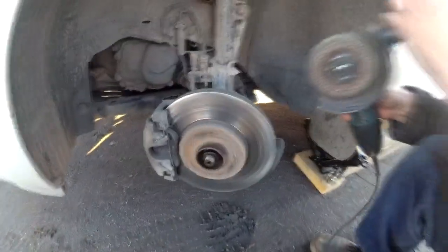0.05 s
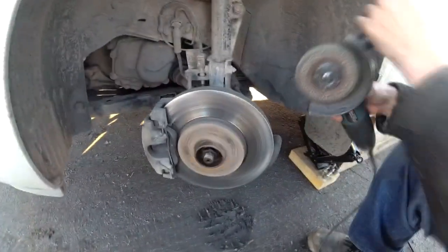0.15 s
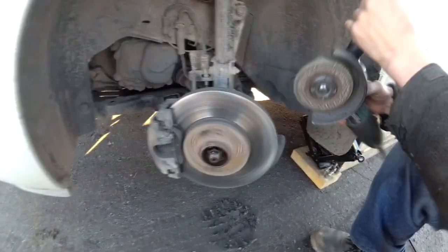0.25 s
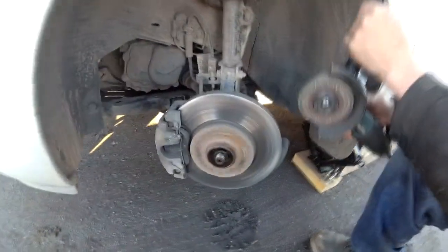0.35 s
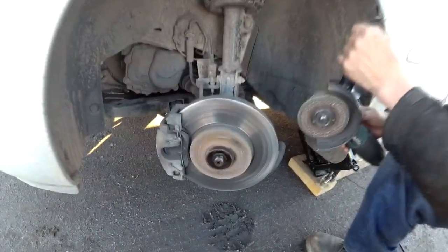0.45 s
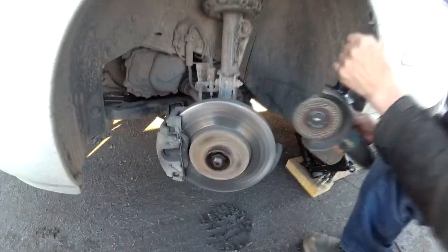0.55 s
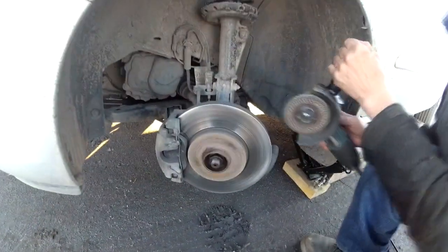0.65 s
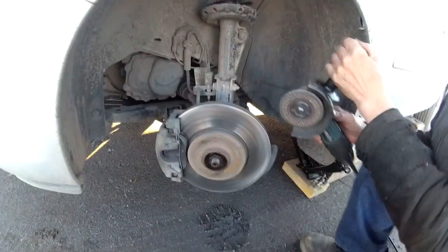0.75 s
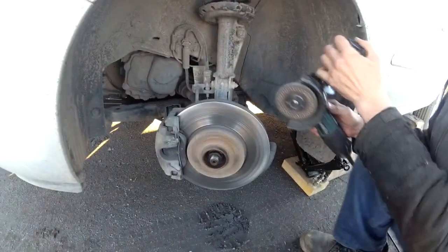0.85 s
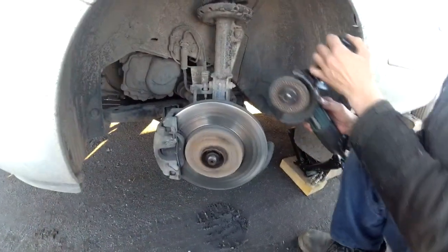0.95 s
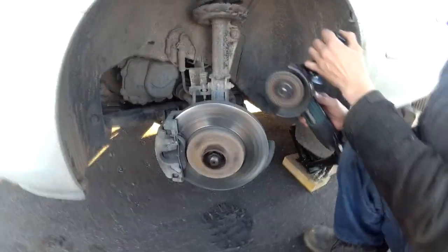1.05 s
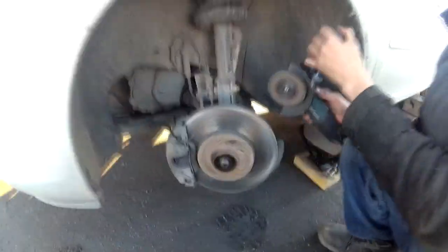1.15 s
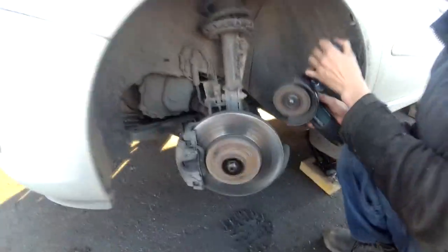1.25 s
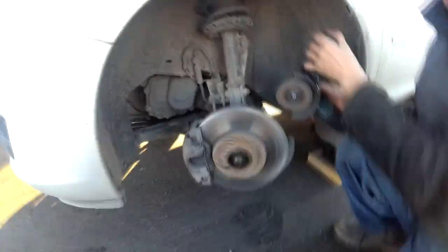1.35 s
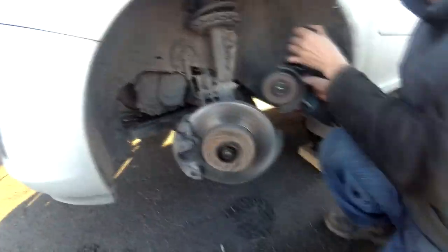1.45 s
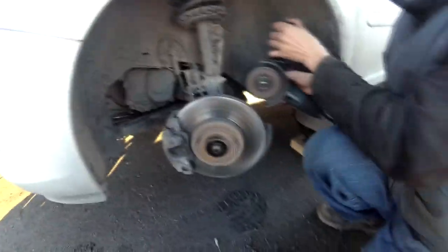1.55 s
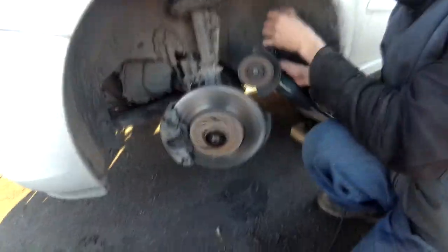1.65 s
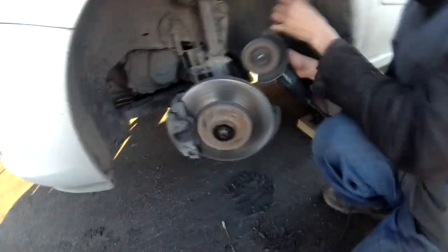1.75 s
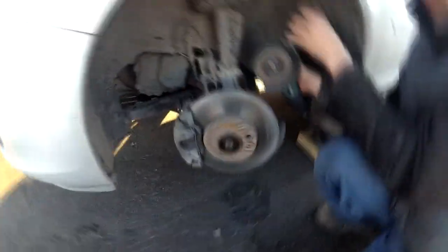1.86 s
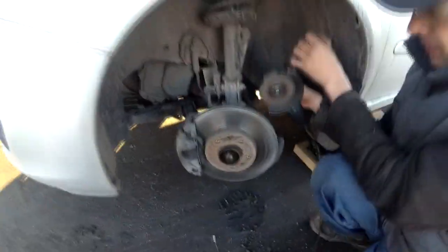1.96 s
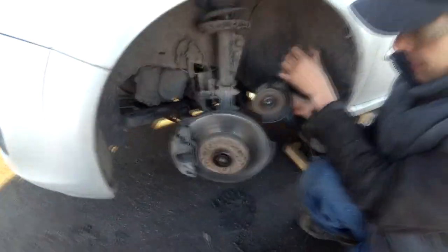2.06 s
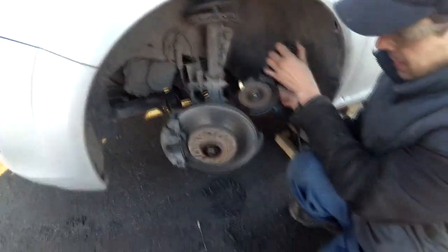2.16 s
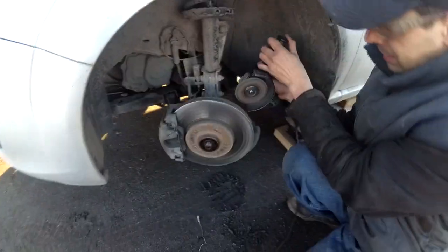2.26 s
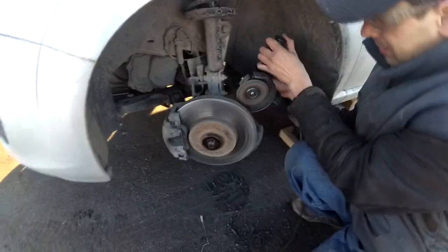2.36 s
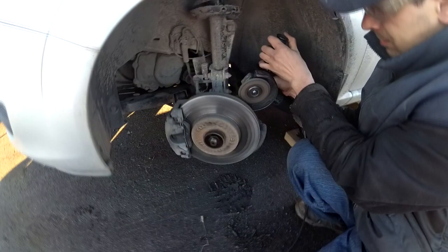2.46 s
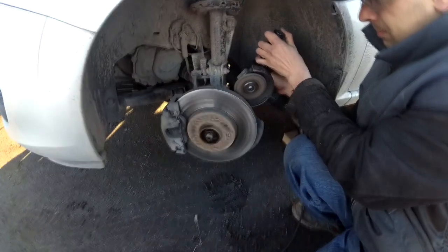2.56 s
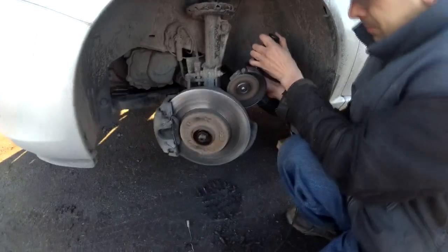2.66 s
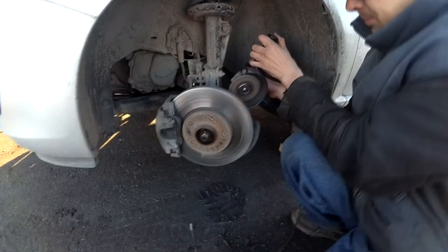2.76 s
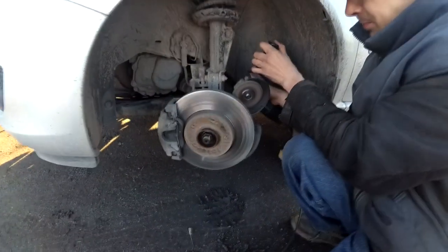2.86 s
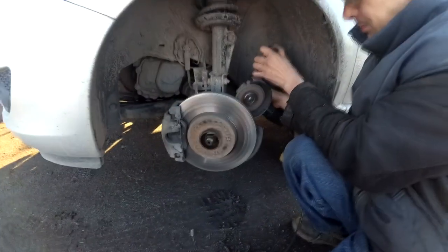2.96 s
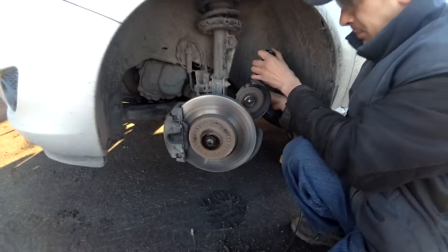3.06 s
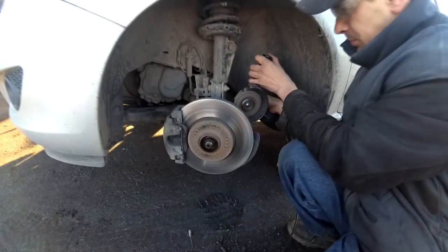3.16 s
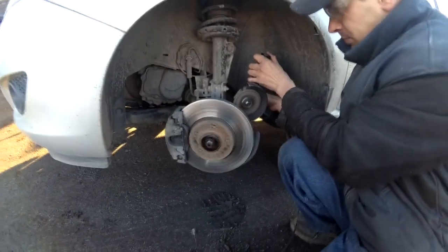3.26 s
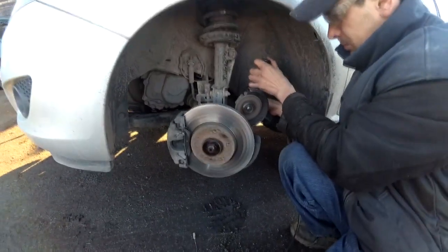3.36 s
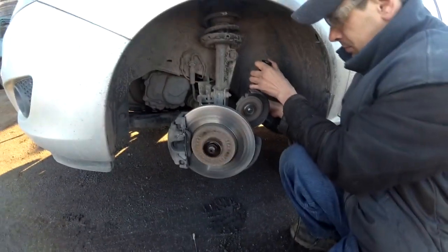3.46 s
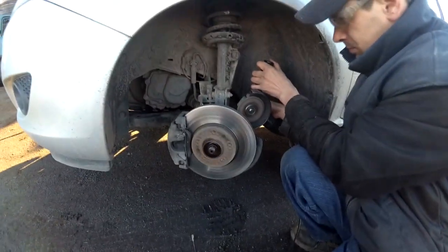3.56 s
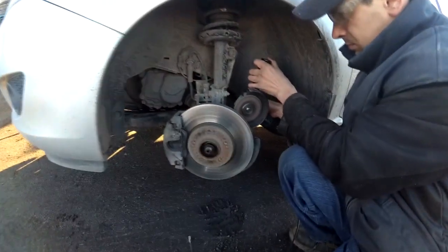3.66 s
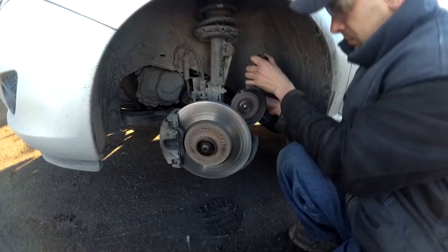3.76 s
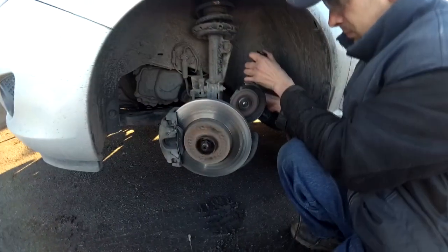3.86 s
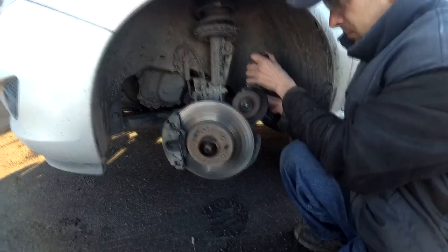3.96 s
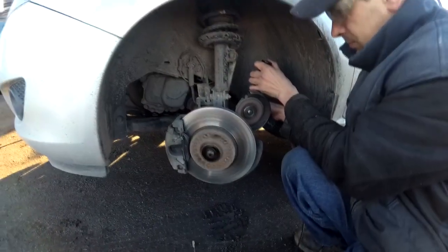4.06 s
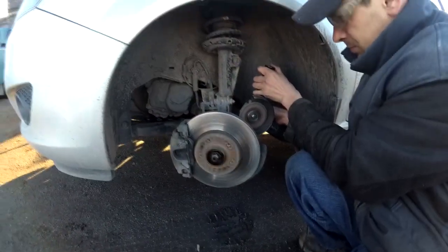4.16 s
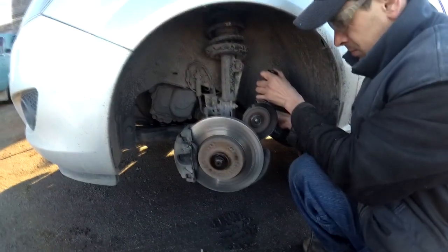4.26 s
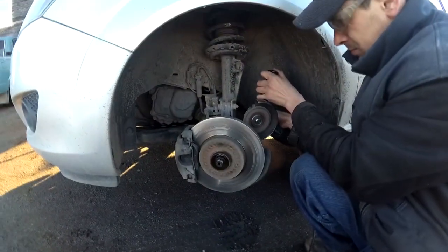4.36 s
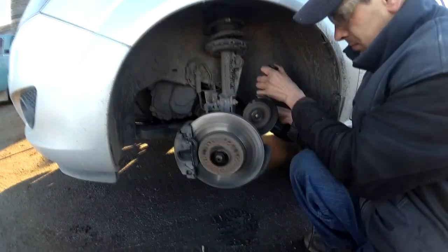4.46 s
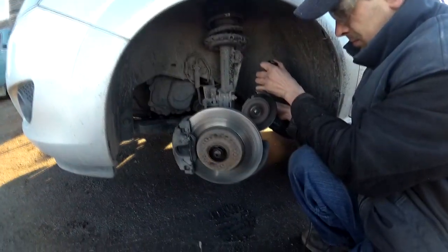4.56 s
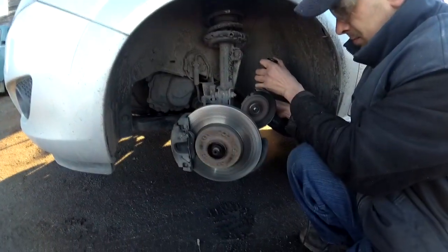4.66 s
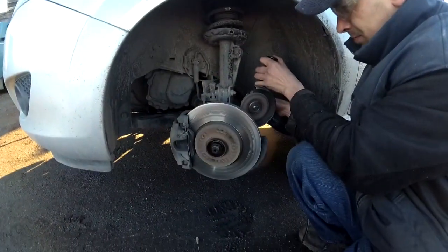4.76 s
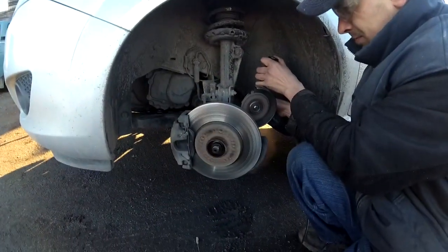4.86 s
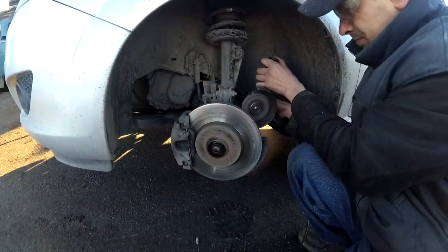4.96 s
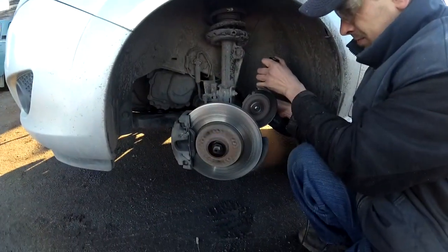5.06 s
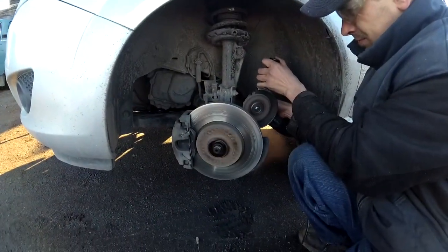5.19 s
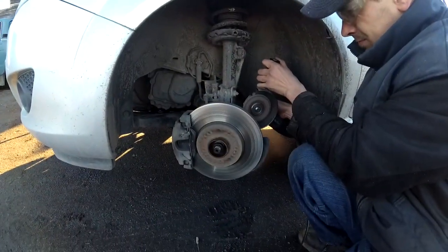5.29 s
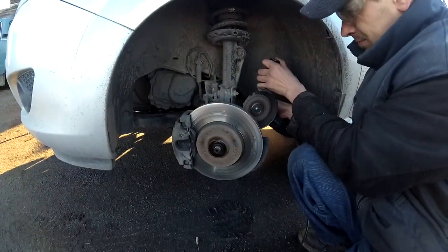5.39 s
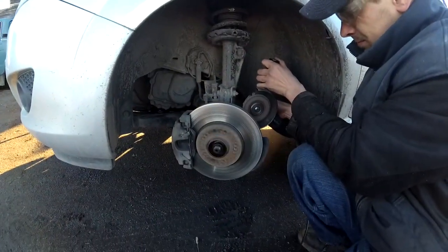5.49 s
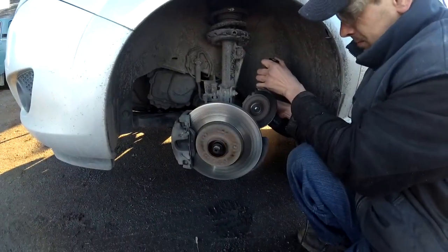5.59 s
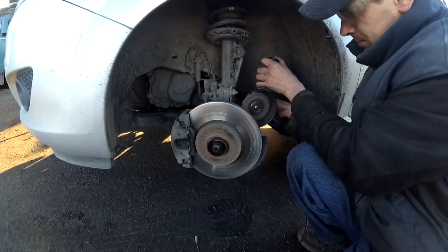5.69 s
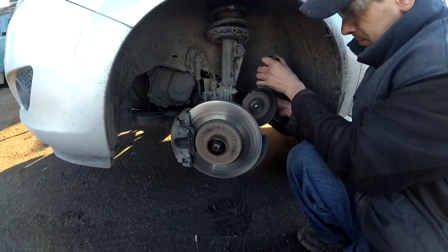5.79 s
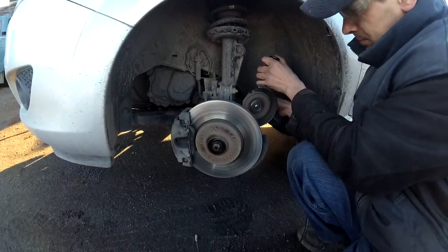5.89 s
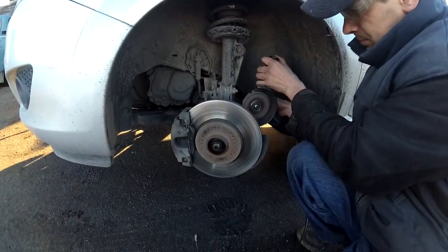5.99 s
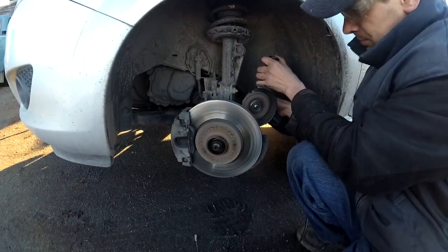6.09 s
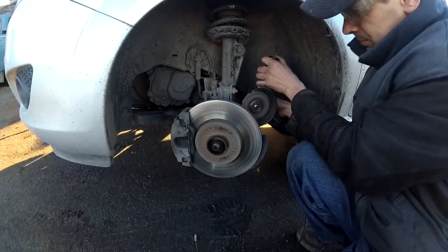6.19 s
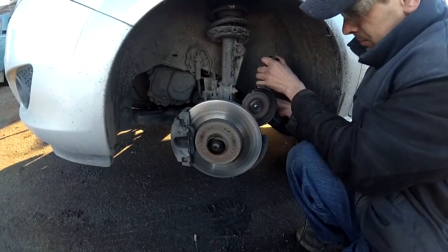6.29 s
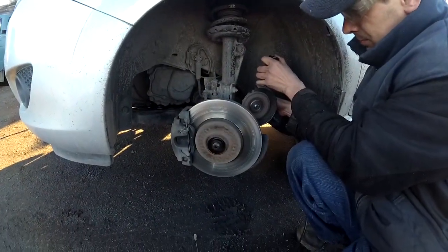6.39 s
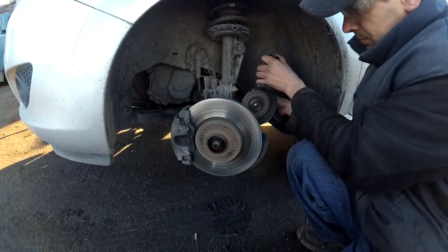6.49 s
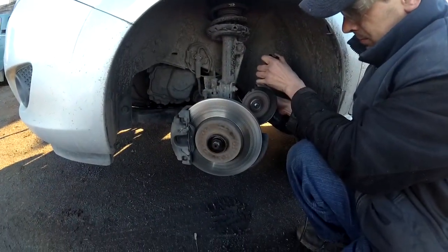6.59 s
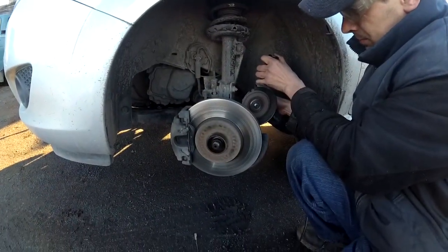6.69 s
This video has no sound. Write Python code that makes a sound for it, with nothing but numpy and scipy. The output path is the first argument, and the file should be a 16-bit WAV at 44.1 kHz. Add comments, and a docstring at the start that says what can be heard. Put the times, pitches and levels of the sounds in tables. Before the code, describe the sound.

Outdoors, close to a car's wheel arch, a steady engine idle throbs with low exhaust rumble and light valve hiss. At about 0.93 s it abruptly becomes much quieter. At 1.1 s a switch clacks and an angle grinder jumps to speed, its rough gear rattle and ringing housing climbing into a full whine with motor roar and airy fan hiss by about 2.3 s. Small dull knocks fall near 2.2 and 2.6 s. A brief glancing scrape comes at 3.1 s; the free whine continues, with a momentary dip near 3.7 s. From 4.1 s the flap disc meets the turning brake disc: harsh bright grit, rapid buzzing repetition and shrill steel resonances, broken by irregular hops and landings. The pitch sags slowly under load, motor and idle sink behind, and scraping becomes denser and more stuttering, still going at the end, about 6.7 s.

```python
"""In a wheel arch beside a jacked-up car with its engine idling, an angle grinder is switched on.
It runs up and whines free: motor noise, fan hiss and gear tones ring through housing and guard.
Then its flap disc meets the rim of the turning brake disc, hopping: grit noise and a pattern repeating
each turn drive the steel's resonances, while motor and fan are heard more faintly. The steady idle is pulsed
noise, heard quieter from .93 s and quieter still under the grinding; dull knocks and street rumble lie behind."""
import sys
import numpy as np
from scipy import signal
from scipy.fft import rfft, irfft, next_fast_len
from scipy.io import wavfile
from scipy.ndimage import uniform_filter1d

SR = 44100
rng = np.random.default_rng(int(sys.argv[2]) if len(sys.argv) > 2 else 0)


def generate_wav(sig):
    """Save sig (samples, or channels by samples) to the path in sys.argv[1] as 16-bit PCM at SR."""
    pcm = np.round(np.clip(np.atleast_2d(sig).T, -1, 1) * 32767).astype(np.int16)
    wavfile.write(sys.argv[1], SR, pcm)


N = 296918
START_S, TOUCH_S = 1.105, 4.105   # switch on; flap disc laid on the rim


def amp(db):
    """Decibels to gain."""
    return 10 ** (np.asarray(db) / 20)


def unit(x):
    """Scale to rms 1."""
    return x / np.sqrt(np.mean(x ** 2) + 1e-20)


def clock():
    """Time of every sample in seconds."""
    return np.arange(N) / SR


def in_time(rows):
    """Join a table of times and levels by straight lines, at every sample."""
    s, level_db = np.transpose(rows)
    return np.interp(clock(), s, level_db)


def colour(x, points):
    """Filter by a (frequency [Hz], level [dB]) curve on a log frequency axis."""
    size = next_fast_len(N + 4096)
    hz, db = np.transpose(points)
    log_hz = np.log(np.maximum(np.arange(size // 2 + 1) * SR / size, 1))
    gain = amp(np.interp(log_hz, np.log(hz), db))
    return irfft(rfft(x, size) * gain, size)[..., :N]


def noise(spectrum):
    """Two unrelated draws of coloured noise: one for what left and right share, one for what differs."""
    return unit(colour(rng.standard_normal((2, N)), spectrum))


def resonate(x, hz, width):
    """Two-pole resonance with gain 1 on top; a narrower width [Hz] rings longer."""
    r = np.exp(-np.pi * width / SR)
    zeros = np.array([1, 0, -1]) * (1 - r * r) / 2
    poles = [1, -2 * r * np.cos(2 * np.pi * hz / SR), r * r]
    return signal.lfilter(zeros, poles, x + 1e-18)


def drift(rate):
    """Slow chance with spread 1: noise through two equal low-passes at rate [Hz]."""
    r = np.exp(-2 * np.pi * rate / SR)
    return unit(signal.lfilter([1], [1, -2 * r, r * r], rng.standard_normal(N + SR))[SR:])


def swell(at, heights, rise_s, fall_s):
    """Envelope that rises fast and dies away after each given time; lone tops reach the given heights."""
    marks, t = np.zeros(N), np.arange(int(.08 * SR)) / SR
    np.add.at(marks, np.minimum((np.asarray(at) * SR).astype(int), N - 1), heights)
    shape = (1 - np.exp(-t / rise_s)) * np.exp(-t / fall_s)
    return signal.fftconvolve(marks, shape / shape.max())[:N]


# free speed, still creeping up until the touch
FREE_TURNS_PER_S, CREEP_TURNS_PER_S2 = 151.4, 3.24
# speed missing at the start: quick and slow part
JUMP_TURNS_PER_S, JUMP_S, CLIMB_TURNS_PER_S, CLIMB_S = 89.1, .1007, 37.2, .56
# speed lost under load: quick and slow part
BITE_TURNS_PER_S, BITE_S, DRAG_TURNS_PER_S, DRAG_S = 5.2, .08, 49, 4.4


def spindle():
    """Turns per second: a jump and a slow climb after the switch, a quick and a slow loss under load."""
    on = np.maximum(clock() - START_S, 0)
    load = np.maximum(clock() - TOUCH_S, 0)
    free = FREE_TURNS_PER_S + CREEP_TURNS_PER_S2 * (on - load)
    missing = JUMP_TURNS_PER_S * np.exp(-on / JUMP_S) + CLIMB_TURNS_PER_S * np.exp(-(on / CLIMB_S) ** 2)
    bite = BITE_TURNS_PER_S * (1 - np.exp(-load / BITE_S))
    drag = DRAG_TURNS_PER_S * (1 - np.exp(-load / DRAG_S))
    return free - missing - bite - drag


# the big hops of the flap disc: (landing [s], scrape sunk by then [dB])
HOPS = [(4.14, -18), (4.225, -8), (4.296, -22), (4.3223, -12), (4.3553, -15), (4.3816, -11), (4.4136, -6),
        (4.5696, -3), (4.59, -10), (4.6102, -28), (4.63, -22), (4.649, -25), (4.6742, -30), (4.698, -35),
        (4.7235, -29), (5.0322, -9), (5.114, -3), (5.1686, -13), (5.2023, -13), (5.321, -11), (5.3764, -9),
        (5.405, -11), (5.4821, -12), (5.5375, -19), (5.5582, -14), (5.5792, -23), (5.6013, -29),
        (5.6196, -25), (5.641, -22), (5.659, -22), (5.7137, -15), (5.736, -21), (5.756, -21), (5.778, -24),
        (5.795, -21), (5.8576, -15), (5.8937, -15), (5.9148, -13), (5.9566, -14), (5.9715, -15),
        (5.9925, -10), (6.014, -14), (6.0594, -15), (6.0795, -16), (6.1087, -9), (6.1304, -19),
        (6.165, -18), (6.1957, -16.5), (6.239, -10), (6.2593, -23), (6.2805, -27), (6.3037, -17),
        (6.318, -13), (6.3337, -17), (6.406, -11), (6.4202, -8), (6.4374, -18), (6.4517, -14),
        (6.4668, -15), (6.4948, -12), (6.511, -14), (6.601, -16), (6.6173, -13), (6.637, -15),
        (6.6573, -14), (6.6764, -21)]
SINK_DB_PER_S, SINK_CURVE = 1400, 0.64   # sets the air time; below 1 the sinking is steepest at first
SETTLE_S = 0.0037   # smoothing, as the disc comes down on the rim again
# share of the other turns that end a small skip, its growth, depth, calm kept round big hops
SKIP_SHARE, SKIP_GROWTH_PER_S, SKIP_DB, SKIP_CLEAR_S = .2, .15, -7.5, 0.011


def hops(turns):
    """Landing times, and the dB lost in the air: big hops as listed, small skips on chance turns."""
    s, lift_db = np.transpose(HOPS)
    laps = np.flatnonzero(np.diff(np.floor(turns))) / SR
    luck = rng.random((len(laps), 2))
    clear = np.abs(laps[:, None] - s).min(axis=1) > SKIP_CLEAR_S
    chance = SKIP_SHARE + SKIP_GROWTH_PER_S * (laps - TOUCH_S)
    skip = (luck[:, 0] < chance) & clear & (laps > TOUCH_S)
    s = np.append(s, laps[skip])
    lift_db = np.append(lift_db, SKIP_DB * (.5 + luck[skip, 1]))
    lost_db = np.zeros(N)
    for at, db in zip((s * SR).astype(int), np.minimum(lift_db, -1)):
        air = int(np.clip(-db / SINK_DB_PER_S, .003, .022) * SR)
        sinking = db * np.linspace(0, 1, air) ** SINK_CURVE
        lost_db[at - air:at] = np.minimum(lost_db[at - air:at], sinking)
    return s, lift_db, uniform_filter1d(lost_db, size=int(SETTLE_S * SR))


# groups of spindle multiples rubbed by the worn flaps:
# (multiple [per turn], width [multiples], level [dB], loudest at [s], lasting [s])
FLAPS = [(22.5, 2.5, -10, 5.1, .5), (52.5, 1.5, -14, 4.8, .35), (64.5, 1.2, -11, 5.8, .7),
         (73.5, 1.5, -12, 4.5, .35), (89, 1.5, -14, 5.9, .35), (94.5, 2.5, -13, 4.7, .35),
         (42, 4, -15, 5.4, 1.2), (82, 1.5, -14, 6.4, .4), (73, 1.5, -15, 5.4, .3)]


def flap_pattern(turns):
    """The worn flaps rub the same way on every turn: groups of spindle multiples that come and go."""
    k, t, out = np.arange(1025), clock(), 0
    place = turns % 1 * 2048
    for mid, width, db, loudest_s, lasting_s in FLAPS:
        phases = 2j * np.pi * rng.random((2, 1025))
        laps = irfft(np.exp(-.5 * ((k - mid) / width) ** 2 + phases))
        # read one stored lap over and over, at the spindle's pace
        rub = [np.interp(place, np.arange(2049), np.append(lap, lap[0])) for lap in laps]
        presence = np.exp(-.5 * ((t - loudest_s) / lasting_s) ** 2)
        out = out + amp(db) * presence * unit(np.array(rub))
    return out


# pressure on the rim, as scrape level before hops and wobble: (time [s], level [dB])
PRESSURE = [(4.11, -23.5), (4.6, -22), (5.0, -22), (5.5, -22.5), (6.0, -21.5), (6.73, -19.5)]
# a first glancing touch: (time [s], peak level before wobble [dB])
BRUSH = (3.1, -16)
# light touches a turn before or after a landing: (time [s])
GRAZES = [4.6045, 4.6448, 4.6678, 4.6915, 5.4929, 5.5528, 5.6133, 5.637, 5.708, 6.0732, 6.1239, 6.1603,
          6.2941, 6.6525]
LANDING_DB, GRAZE_DB = -21, -30   # thump of a landing from a 15 dB hop; a graze, both before wobble


def contact(turns):
    """Pressure on the rim: beats with the turns, is lost in every hop and thumps on landing."""
    s, lift_db, lost_db = hops(turns)
    steady = amp(in_time(PRESSURE) + lost_db + 0.17 * drift(34)) * (clock() > TOUCH_S)
    # the higher the hop, the harder the landing
    landing_db = LANDING_DB - 0.15 * (lift_db + 15)
    landing = swell([*s, BRUSH[0]], amp(np.append(landing_db, BRUSH[1])), 0.0027, .002)
    graze = swell(GRAZES, amp(GRAZE_DB), .002, .002)
    # the disc runs out of true: the pressure varies once and twice a turn
    wobble = amp(0.92 * np.cos(2 * np.pi * turns) + 1.1 * np.cos(4 * np.pi * turns + 0.12))
    return (steady + landing + graze) * wobble


# colour of the grit scrape: (frequency [Hz], relative level [dB per Hz])
SCRAPE = [(880, -49), (1500, -37.5), (2500, -3.5), (2730, -4.5), (3020, -2.5), (3560, -3), (4650, -0.5),
          (5130, -1), (5830, -1.5), (7230, -8), (7830, -3.5), (11700, -2), (12500, 0), (14400, -9.5),
          (15700, -17.5)]
# brake disc modes, before an 11 dB lift and their swelling; widths under 45 Hz play as 45:
# (frequency [Hz], width [Hz], level [dB])
BRAKE = [(3628, 40, -12.5), (5223, 68, -11.5), (5937, 27, -4), (6370, 130, -9), (7010, 38, -5),
         (7470, 46, -20.5), (7945, 45, -2.5), (8730, 43, -15), (9120, 70, -9), (9600, 37, -17),
         (9900, 86, -14), (10590, 140, -15.5), (11400, 100, -13), (10650, 94, -25), (12500, 12, -18),
         (12680, 190, -7), (14400, 160, -12), (14200, 75, -20)]
# the loudest modes swell and fade as the contact spot wanders:
# (frequency [Hz], mean [dB], swing [dB], loudest at [s], period [s])
SWELLS = [(3610, 2.5, 7.5, 4.3, 1.85), (5940, 2.5, 5, 5.17, 3), (7970, 1.5, 5.5, 4.37, 2.22),
          (9100, 2, 1, 5.1, 2.9), (12700, -0.5, 4, 5.7, 2.7), (14500, -7, 7, 4.3, 3.9)]
# where the brake disc radiates little: (frequency [Hz], width [Hz], depth [0-1])
HOLLOWS = [(2720, 260, .85), (4550, 520, .9), (7250, 350, .65), (13500, 300, .45)]


def grinding(turns):
    """Grit and flaps under the contact pressure drive the brake disc's modes, which make the steel sing."""
    t = clock()
    press = contact(turns)
    flaps = press * flap_pattern(turns + .0012 * drift(30))
    drive = press * noise(SCRAPE) + amp(-17.0) * flaps
    # one hard spot gives a bright tick each turn
    hard_spot = np.exp(4.3 * (np.cos(2 * np.pi * turns - .3) - 1))
    tick = press * hard_spot * noise([(3000, -30), (9000, -3), (13000, 1.0), (15800, -1.0)])
    out = amp(-6) * drive + flaps + amp(0.5) * tick
    for hz, width, db in BRAKE:
        nearest = min(SWELLS, key=lambda row: abs(row[0] - hz))
        loud_hz, mean_db, swing_db, loudest_s, period_s = nearest
        if abs(loud_hz / hz - 1) < .03:
            wander_db = mean_db + swing_db * np.cos(2 * np.pi * (t - loudest_s) / period_s)
        else:
            wander_db = 2.5 * drift(2)
        out += amp(db + 11.0 + wander_db) * resonate(drive, hz, max(width, 45))
    for hz, width, depth in HOLLOWS:
        out -= depth * resonate(out, hz, width)
    return out


# motor roar as the tool moves about the arch, heard more faintly while the grinding is loud,
# before throb and housing: (time [s], level [dB])
MOTOR = [(1.1, -34.5), (1.2, -27.5), (1.27, -32), (1.77, -28.5), (1.88, -30.5), (2.26, -32.5), (2.34, -29),
         (2.45, -31.5), (3.0, -28.5), (3.6, -28), (4.1, -28.5), (4.55, -36), (4.62, -40.5), (5.0, -37.5),
         (5.5, -43), (6.73, -42)]
# colour of the roar: (frequency [Hz], relative level [dB per Hz])
ROAR = [(150, -61), (250, -15), (555, -6.5), (754, -7.5), (1010, -6.5), (1450, -5.5), (2530, 0.5),
        (5540, -6.5), (6000, -2.5), (7800, -4.5), (13200, -120)]


def motor_roar():
    """Broad motor noise following the motor's level curve."""
    return amp(in_time(MOTOR)) * noise(ROAR)


# colour of the fan hiss: (frequency [Hz], relative level [dB per Hz])
HISS = [(1760, -28), (3000, -3.5), (4210, -2.5), (5520, -1), (6040, -2), (9220, -1.5), (11000, -1.5),
        (14800, -10.5), (15700, -16.5)]
FAN_DB, FAN_POWER = -24, 1.07   # level at the free speed; power of speed, both before throb and housing
FAN_FAINT_DB, FAN_FADE_S = -37.5, 0.39   # fainter level during the grinding, before the speed's share; fade


def fan_hiss(speed):
    """Air noise that grows with speed and is heard more faintly while the grinding is loud."""
    faded = 1 - np.exp(-np.maximum(clock() - TOUCH_S, 0) / FAN_FADE_S)
    speed_db = 20 * FAN_POWER * np.log10(speed / FREE_TURNS_PER_S)
    hiss_db = FAN_DB + speed_db + (FAN_FAINT_DB - FAN_DB) * faded
    return amp(hiss_db + 1.03 * drift(42)) * noise(HISS)


MAINS_HZ = 50
GEAR_TEETH, PINION_TEETH, BARS = 35, 10, 32   # bars: commutator segments
# bevel gear rattle, before bites and housing: (time [s], level [dB])
GEAR = [(1.1, -39), (1.17, -29), (1.26, -24), (1.77, -21), (1.87, -25), (1.97, -20.5), (3.25, -26),
        (3.5, -42), (4.1, -43), (4.6, -48), (6.73, -41)]


def bevel_gear(turns, armature):
    """Backlash: the teeth bite in short uneven bursts, and the mesh phase stumbles."""
    loose = np.clip((turns - 60) / 35, 0, 1)
    # while speeding up, each torque pulse makes one bite
    kicks = np.arange(1.1065, 2.2, 1 / (2 * MAINS_HZ))
    kick_heights = amp(2.5 * rng.standard_normal(len(kicks)))
    kicked = 0.36 + 1.34 * swell(kicks, kick_heights, .0015, 0.0023)
    # later the bites fall at random, about 85 a second
    bites = np.flatnonzero(rng.random(N) < 85 / SR) / SR
    bite_heights = amp(3.0 * np.clip(rng.standard_normal(len(bites)), -2, 1.4))
    rattled = .22 + 1.5 * swell(bites, bite_heights, .001, .0018)
    bite = (1 - loose) * kicked + loose * rattled
    stumble = (1.2 + .7 * loose) * np.array([drift(120), drift(120)])
    mesh = 2 * np.pi * GEAR_TEETH * turns + stumble
    octave = amp(-6.0) * (0.28 + 0.76 * loose) * np.sin(2 * mesh + 2.1 * loose * drift(220))
    gear = amp(in_time(GEAR)) * bite * (np.sin(mesh) + octave)
    # an eccentric pinion splits the mesh tone into strands
    gear *= 1 + .8 * np.cos(armature)
    # each bite also jingles high in the gear case
    case = noise([(8000, -61), (9800, -3), (10700, 2), (11600, -6), (13500, -40)])
    return gear + amp(in_time(MOTOR) - 1.0) * loose * bite * case


# armature hum, before throb and housing: (time [s], level [dB])
HUM = [(1.1, -58), (1.25, -48), (1.5, -51.5), (2.3, -46.5), (2.45, -54), (2.9, -55), (3.1, -49), (4.1, -55),
       (4.6, -68)]


def armature_tones(armature):
    """Commutator whine at the bar rate, and a hum once per armature turn."""
    whine = amp(in_time(GEAR) - 9) * np.sin(BARS * armature + 1.9 * drift(90))
    hum_db = in_time(HUM) + 2.9 * drift(6.9)
    return whine + amp(hum_db) * np.sin(armature + 0.61 * drift(7.9))


# switch and first gear blow, before the housing: (time [s], peak level [dB])
SWITCH = [(1.105, -22), (1.111, -23)]
# colour of the switch clack: (frequency [Hz], relative level [dB per Hz])
CLACK = [(300, -30), (700, 4), (1200, -3), (2600, 4.5), (6000, -16), (15000, -10)]


def switch_clack():
    """Two very short noise bursts."""
    s, peak_db = np.transpose(SWITCH)
    return swell(s, amp(peak_db), 0.00047, 0.0043) * noise(CLACK)


# housing resonances, before a 7.5 dB trim: (frequency [Hz], width [Hz], level [dB])
HOUSING = [(586, 82, 2), (996, 180, 8), (1264, 400, -4.5), (1653, 94, 7), (2049, 47, 9), (2532, 51, 8.5),
           (3170, 500, 0.5), (3730, 140, -1), (4620, 51, -19), (5360, 150, -0.5), (8570, 99, 3),
           (11080, 2600, 5)]
# guard ringing under starting torque: (frequency [Hz], width [Hz], level at the switch [dB])
STRAIN = [(1290, 130, 13.5), (2620, 140, 6.5), (3500, 290, 6.5), (4510, 190, 6.5), (5330, 82, 10),
          (6540, 160, -12)]
STRAIN_FADE_S, THROB = 0.58, 0.13   # fade of the starting strain; depth of the mains throb [0-1]


def grinder(turns, speed):
    """Roar, hiss, gear, armature and switch, ringing in housing and guard."""
    t = clock()
    running = t > START_S
    armature = 2 * np.pi * GEAR_TEETH / PINION_TEETH * turns
    gear = bevel_gear(turns, armature) * running
    # torque pulses at twice the mains rate
    pulse = 1 + THROB * np.cos(2 * np.pi * 2 * MAINS_HZ * (t - 1.107))
    motor = (motor_roar() + fan_hiss(speed) + armature_tones(armature)) * pulse
    drive = motor * running + gear + switch_clack()
    strain = np.exp(-np.maximum(t - START_S, 0) / STRAIN_FADE_S)
    housing = sum(amp(db - 7.5) * resonate(drive, hz, width) for hz, width, db in HOUSING)
    # a hollow between the guard's low modes
    drive -= 0.45 * resonate(strain * drive, 1700, 700)
    guard = sum(amp(db) * resonate(strain * drive, hz, width) for hz, width, db in STRAIN)
    # the mesh is heard mostly through the resonances it crosses
    return drive - 0.62 * gear + housing + guard


# level of the steady idle, heard quieter from .93 s, quieter still under the grinding:
# (time [s], level before stereo [dB])
IDLE = [(0, -31.5), (.925, -33), (.94, -44.5), (1.3, -43), (1.9, -47), (2.6, -44.5), (4.25, -47),
        (4.45, -52.5), (6.73, -51.5)]
# colour of the exhaust and valve noise: (frequency [Hz], relative level [dB per Hz])
IDLE_COLOUR = [(15, -58), (25, -20), (59, -35), (80, -15), (241, -2.5), (291, -8), (499, -16), (653, -15.5),
               (832, -12.5), (1470, -18), (3670, -24), (4670, -24.5), (8240, -28), (10800, -21.5),
               (15700, -37.5)]
# exhaust and block resonances: (frequency [Hz], width [Hz], level [dB])
IDLE_TONES = [(87.8, 6, 0.5), (168.5, 19, -5.5), (241, 14, -4), (347, 17, 2.5), (492, 25, 5.5),
              (958, 20, 1), (1466, 21, 2)]
FIRING_HZ = 31.1


def engine():
    """Exhaust rumble and valve hiss, both pulsing with the firing."""
    beat = np.sin(2 * np.pi * FIRING_HZ * clock() + 0.74 + 0.74 * drift(1.6))
    pulsed = rng.standard_normal((2, N)) * amp(1.4 * beat + 0.73 * drift(15))
    puffs = colour(pulsed, IDLE_COLOUR)
    ringing = sum(amp(db) * resonate(puffs, hz, width) for hz, width, db in IDLE_TONES)
    return amp(in_time(IDLE)) * unit(puffs + ringing)


# dull knocks: (time [s], envelope peak [dB], pitch [Hz])
KNOCKS = [(2.158, -34, 242), (2.609, -30, 242), (5.12, -48, 367), (6.238, -45, 188), (6.668, -47, 237)]


def knocks():
    """Something dull bumps now and then: a short low ring."""
    out = np.zeros(N)
    for s, db, hz in KNOCKS:
        out += swell([s], amp(db), 0.0019, 0.0064) * np.sin(2 * np.pi * hz * (clock() - s))
    return out


def street_rumble():
    """Distant street: low noise at -70 dB."""
    return amp(-70) * noise([(12, -20), (25, -3), (70, -15), (160, -9), (400, -60)])


def two_ears(x, side_db, lag):
    """Scattered sound reaches left and right unlike; a slope term stands for later arrival at the left."""
    side = colour(x[1] - lag * np.gradient(x[0]), side_db)
    return np.array([x[0] + side, x[0] - side])


# the tool's scattered sound that differs left to right:
# (frequency [Hz], level against the shared sound [dB])
ARCH = [(60, -14), (99, -12), (160, -12), (270, -17), (450, -22), (740, -18), (1220, -24), (2010, -25),
        (3330, -24), (5500, -8), (9080, -6), (15000, -3.5)]
# the tool's tilt to the left: (frequency [Hz], left minus right [dB])
LEAN = [(200, 1), (700, 1.3), (1290, .3), (2380, .2), (4400, 2.2), (8120, 1.8), (15000, 1)]
# the engine's sound that differs left to right: (frequency [Hz], level against the shared sound [dB])
IDLE_SIDE = [(60, -13), (110, -9), (200, -21), (380, -20), (700, -19), (1290, -14), (2380, -14), (4400, -7),
             (8120, 2), (15000, 3)]
# the whole level dips at once and recovers: (time [s], depth [dB], recovery [s])
DIPS = [(1.83, -3, 0.28), (3.672, -6, 0.073)]


def scene():
    """Engine all around, tool a little to the left."""
    speed = spindle()
    turns = np.cumsum(speed) / SR
    left, right = two_ears(grinder(turns, speed) + grinding(turns), ARCH, lag=0.62)
    lean = np.array(LEAN) * [1, .5]   # half the difference to each side
    tool = np.array([colour(left, lean), colour(right, lean * [1, -1])])
    idle = two_ears(engine(), IDLE_SIDE, lag=0) * amp([[.6], [-.6]])
    t = clock()
    dip_db = sum(db * (t > s) * np.exp(-np.maximum(t - s, 0) / back_s) for s, db, back_s in DIPS)
    return (tool + idle + street_rumble() + knocks()) * amp(dip_db)


def record(dry):
    """Nothing sounds above about 16 kHz; peaks are rounded."""
    cut = signal.cheby2(20, 70, 15950, fs=SR, output="sos")   # 70 dB down from 15950 Hz
    rounded = .55 * np.tanh(signal.sosfilt(cut, dry) / .55)
    return signal.sosfilt(cut, rounded)


dry = scene()
out = record(dry)
generate_wav(out)
```